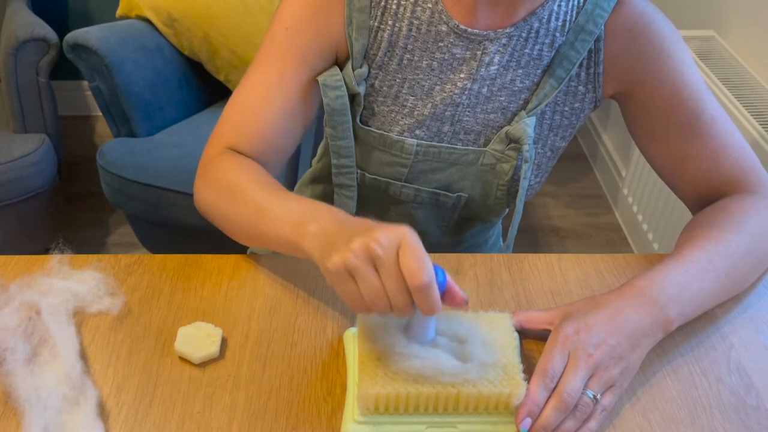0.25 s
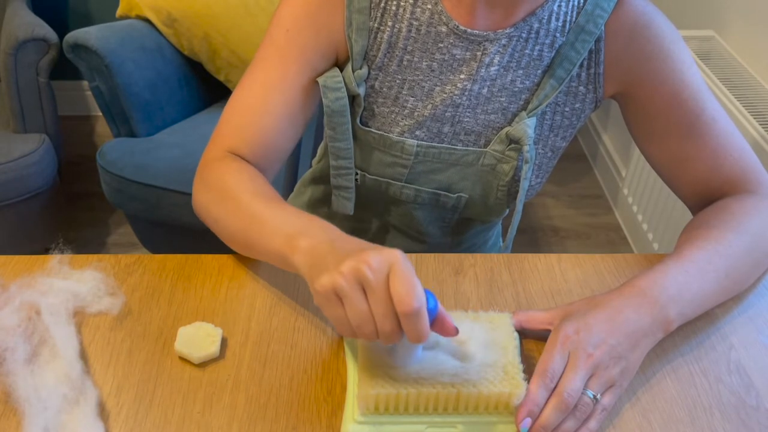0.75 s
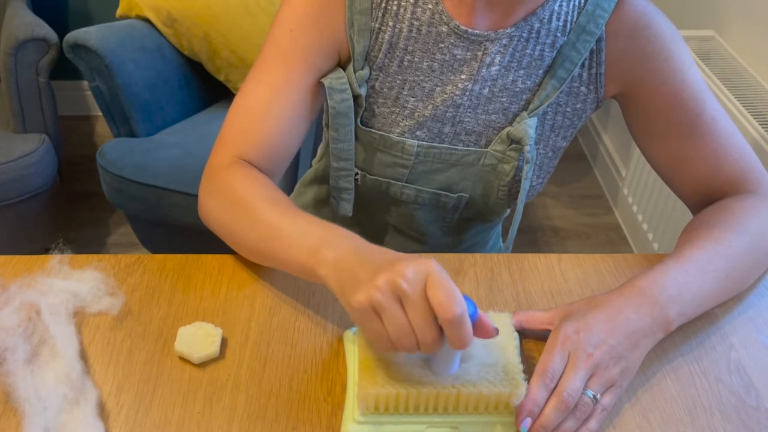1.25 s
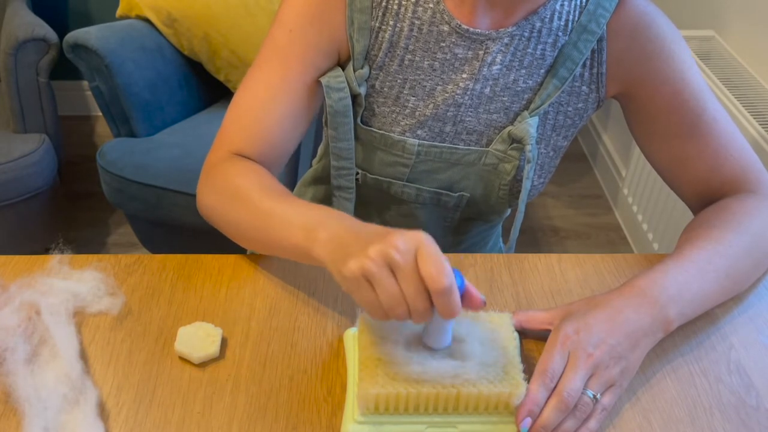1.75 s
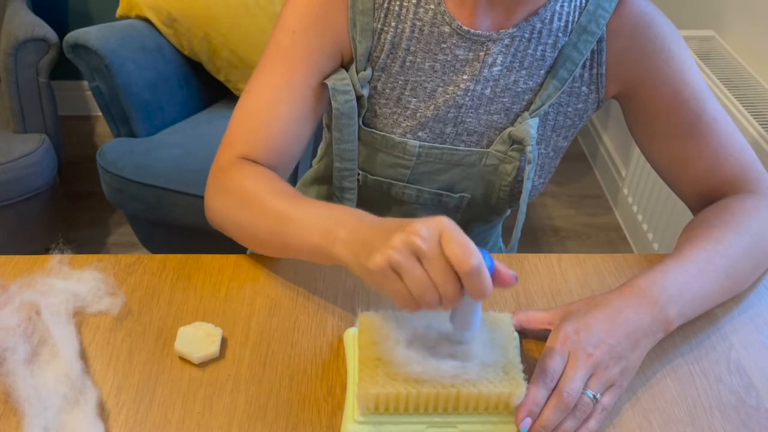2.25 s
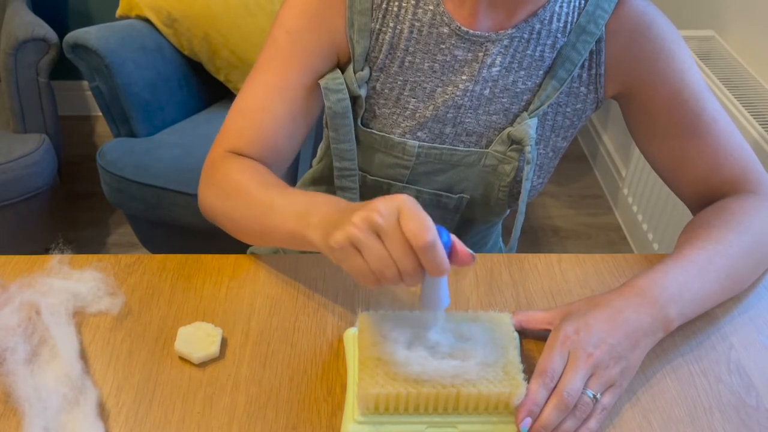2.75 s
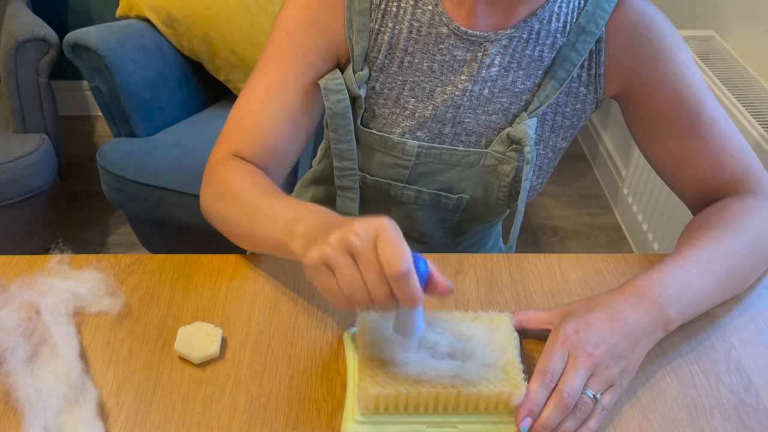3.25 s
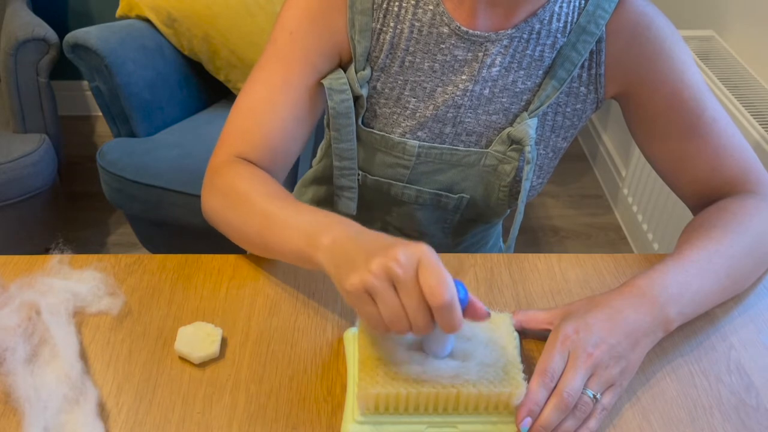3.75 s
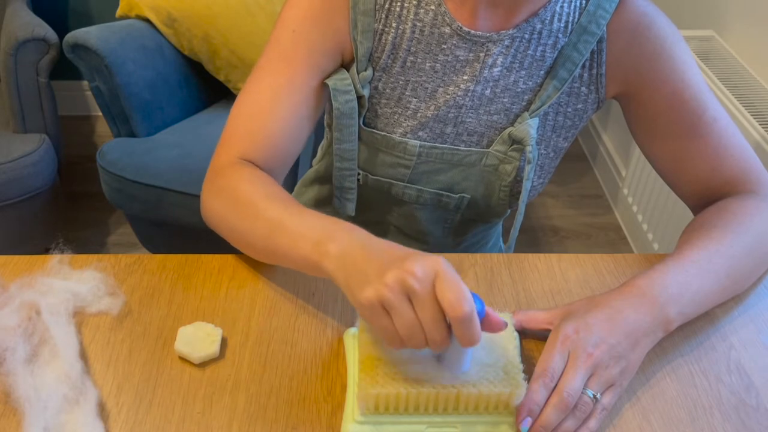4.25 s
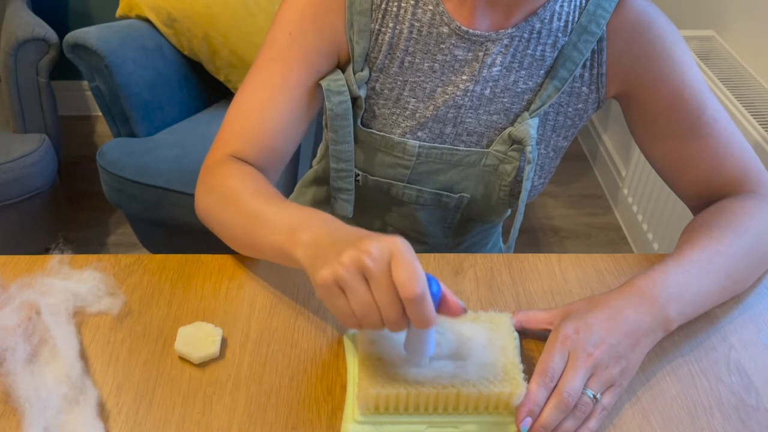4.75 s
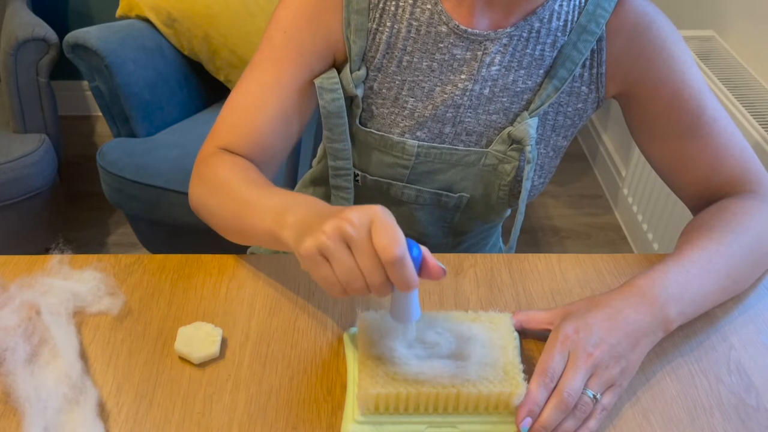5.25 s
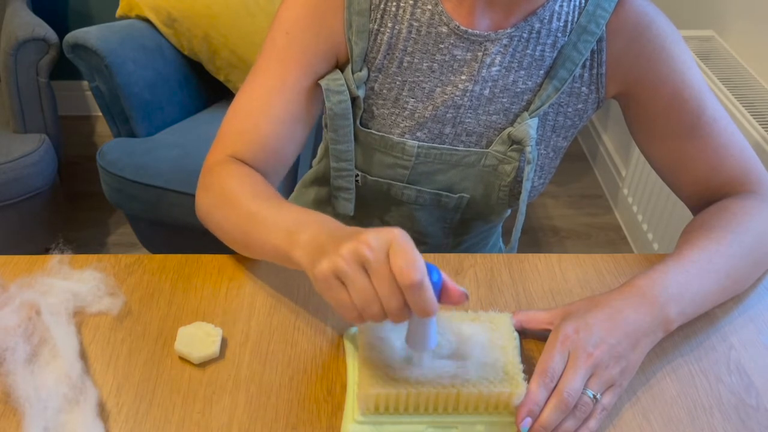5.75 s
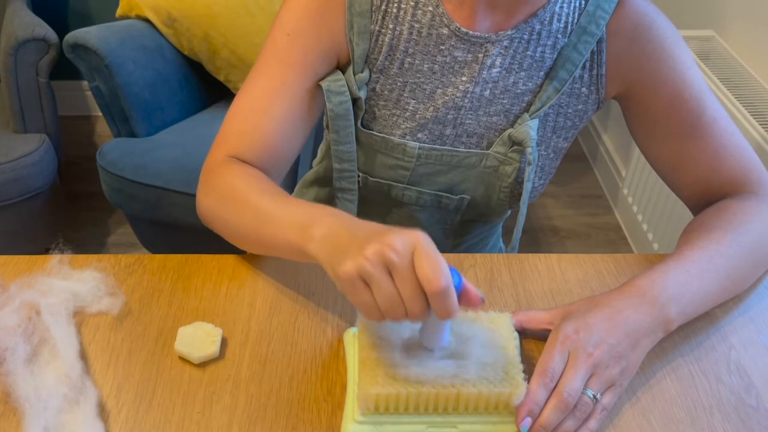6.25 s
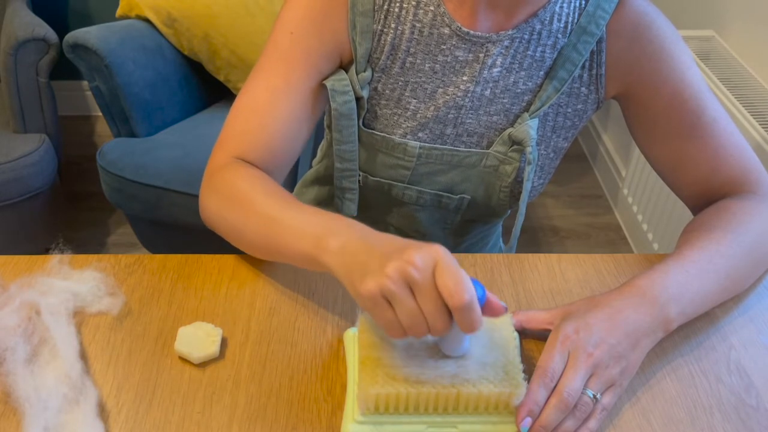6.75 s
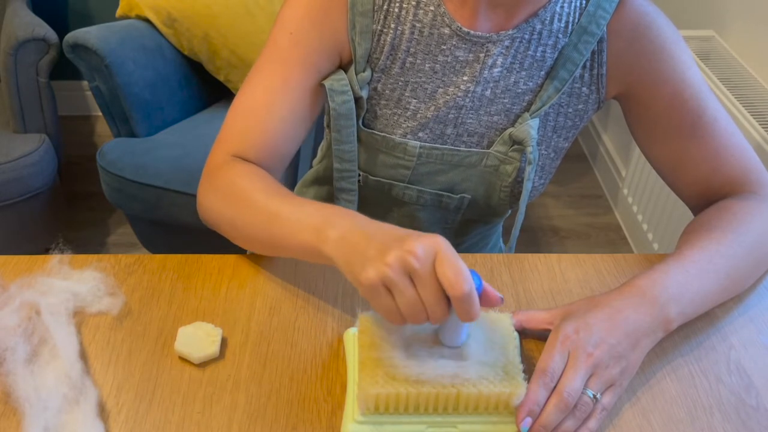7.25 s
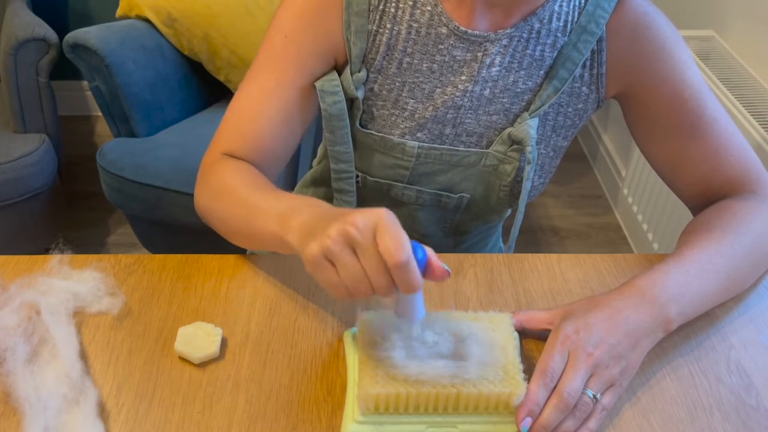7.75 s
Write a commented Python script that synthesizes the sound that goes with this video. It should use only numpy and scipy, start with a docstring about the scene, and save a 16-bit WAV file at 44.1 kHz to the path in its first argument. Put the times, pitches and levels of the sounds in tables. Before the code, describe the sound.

Close in a small room, a plastic multi-needle tool punches wool on a bristle mat about four times a second. Each stab brings a light clack, a short fibrous crunch, and a blunt low thump through the wooden table; as the tool lifts, its guard ticks free and snaps back sharply. Faint metallic ringing and a little room reflection follow, over low rumble and slight hiss.

```python
"""Needle felting at a wooden table: a spring-guarded multi-needle tool stabs wool on a bristle mat.
As the tool lifts, its plastic guard ticks free and snaps against its stop: short bursts of tiny impacts.
Before most stabs the guard clacks down; then bristles and fibres crunch as random grains of stick-slip.
The needle tips jab, and the tool bottoms out with a blunt knock and decaying modes of board and table.
After every contact needles and spring ring faintly and a small room answers, over steady rumble and hiss."""
import sys
import numpy as np
from scipy import signal
from scipy.fft import rfft, irfft
from scipy.io import wavfile
from scipy.ndimage import uniform_filter1d

SR = 44100
rng = np.random.default_rng(int(sys.argv[2]) if len(sys.argv) > 2 else 0)


def wrap_up_sound(samples):
    """Save the sound to the file named by the first command line argument, as 16-bit audio."""
    columns = np.atleast_2d(samples).T
    # keep every value between -1 and 1, then stretch to whole-number steps
    tamed = np.clip(columns, -1, 1)
    steps = np.round(tamed * 32767).astype(np.int16)
    wavfile.write(sys.argv[1], SR, steps)


N = 353461  # samples

# All levels in the tables are relative: each layer has a gain of its own.
# Stabs, timed where the tool bottoms out:
# [t/s, push level/dB, thump level/dB, knock level/dB, crunch level/dB]
STABS = [(0.162, -21.5, -23.5, -30, -38.5), (0.403, -21.5, -22, -29, -40),
         (0.651, -16.5, -20, -27.5, -42.5), (0.89, -22, -15, -30, -40.5), (1.127, -24.5, -17.5, -30.5, -43),
         (1.367, -24.5, -25.5, -48, -39.5), (1.591, -23.5, -22, -35, -41), (1.808, -28, -19, -26.5, -39.5),
         (2.039, -25, -18.5, -36.5, -40.5), (2.264, -27.5, -19.5, -32, -40.5),
         (2.507, -20.5, -17.5, -27.5, -38), (2.729, -19, -17, -23.5, -38), (2.969, -23, -20, -30.5, -38.5),
         (3.199, -17, -16, -24, -52), (3.435, -18.5, -19.5, -30, -40.5), (3.656, -27, -21, -37, -44.5),
         (3.888, -26.5, -20, -35, -44.5), (4.116, -26, -21.5, -35.5, -41),
         (4.341, -23.5, -16.5, -31.5, -46), (4.569, -20.5, -16, -30.5, -43.5),
         (4.812, -22, -22, -29.5, -41), (5.033, -19.5, -21.5, -26, -40), (5.259, -19.5, -20, -26.5, -37.5),
         (5.489, -16.5, -19, -25.5, -39), (5.712, -26, -17.5, -34.5, -38.5), (5.943, -25, -19, -33.5, -53),
         (6.193, -20.5, -21.5, -32, -41.5), (6.415, -26.5, -28, -42.5, -38.5),
         (6.642, -35, -28.5, -46.5, -44.5), (6.843, -25, -23.5, -55, -41), (7.085, -25.5, -23, -48.5, -42),
         (7.31, -21, -23.5, -34.5, -44), (7.515, -22.5, -24, -34.5, -43), (7.74, -18.5, -19.5, -27, -41),
         (7.961, -18.5, -22.5, -29.5, -40.5)]
# Guard springing back to its stop: [t/s, level/dB, strongest ring f/Hz, extra top/dB, extra barrel/dB]
SNAPS = [(0.0288, -12.5, 6500, 0, -0.5), (0.2666, -10.5, 7500, 4, 0.5), (0.4921, -1.5, 5850, 6, -1),
         (0.7398, -3, 5000, 2, 0), (0.9912, -0.5, 6410, 5, -0.5), (1.2339, -7, 6800, 0, 1.5),
         (1.4707, -4, 7760, 5.5, -3.5), (1.704, -11.5, 7620, -1, -0.5), (1.919, -10.5, 6300, 3, 0.5),
         (2.156, -7, 6780, 4, -2.5), (2.3657, -4, 6500, 0, 0), (2.611, -4.5, 6850, 6, -1),
         (2.8346, -5.5, 6100, 7, 2.5), (3.0661, -6.5, 5900, 3, -2.5), (3.3061, -1.5, 6600, 4, 1),
         (3.5439, -3, 6260, 2, 0.5), (3.7791, -13.5, 7160, 0, -2), (4.0031, -9, 6200, 0, -0.5),
         (4.2235, -3, 6500, 4, 0.5), (4.4516, -5.5, 6350, 7, 3), (4.6724, -6.5, 6370, 8.5, 2),
         (4.9067, -9, 7600, 0, 3), (5.136, -5, 7600, 8.5, -0.5), (5.359, -8.5, 7210, -1, 4),
         (5.5936, -3, 6350, 4.5, -5), (5.8235, -5.5, 6650, 3, 2.5), (6.0548, -6, 6800, 6, 3.5),
         (6.2972, -5.5, 6320, 3, -1.5), (6.5261, -7, 6350, -5, -1), (6.7397, -12, 4830, 4, -3.5),
         (6.9603, -4, 6600, 7, 2), (7.196, -19, 7950, 6, -6), (7.4057, -6, 6600, 7, 1),
         (7.6177, -5, 5330, 10, 1.5), (7.8397, -2.5, 6200, 4, 2.5)]
# Guard landing on the wool and being pushed in, plus one bright needle jab at 5.482 s: [t/s, level/dB, extra
# top/dB, extra barrel/dB]
CLACKS = [(0.135, -14.5, 1, -0.5), (0.3587, -37, -1, 6), (0.6402, -25.5, 8, 3), (0.8676, -15.5, 2.5, 0),
          (1.1046, -23.5, -10, 0.5), (1.3321, -21.5, -4, -2.5), (1.7778, -34.5, -11, 2),
          (1.9999, -30.5, -6, 10), (2.0106, -29, -12, 4), (2.223, -37, -8, 12), (2.4614, -33, -4, 3),
          (2.706, -17.5, -2, 1.5), (2.9363, -18, -6, -2), (3.1578, -25, -1, 4), (3.1711, -13, -1, -2),
          (3.8448, -33.5, -14, 4), (4.0645, -29.5, -1, 0), (4.5342, -35, -9, 7), (4.7809, -17.5, -0.5, 0),
          (4.9726, -27.5, -2, -4.5), (5.0105, -27, -4, -3), (5.2296, -14, -7.5, -4),
          (5.4392, -28.5, -6, -2), (5.4577, -26, 0, 0), (5.482, -27, 10, -6), (5.6919, -14.5, -3, -7),
          (5.916, -18.5, -3, 1.5), (6.1242, -26, -4, -2), (6.3857, -21.5, -7, -6.5), (7.0322, -25, -2, -1),
          (7.2729, -31.5, -14, 3), (7.4824, -17, -6, 0.5), (7.7076, -20.5, -1.5, 0.5),
          (7.896, -31.5, -5, 0), (7.909, -31, 1, 0)]
# Guard coming unstuck from the barrel as the hand lifts: [t/s, level/dB]
TICKS = [(0.0155, -16), (0.219, -14), (0.4607, -11), (0.9469, -14.5), (1.1902, -15.5), (1.4465, -12),
         (1.6674, -13.5), (1.8711, -17), (2.5683, -11.5), (2.7911, -13.5), (3.039, -11), (3.3695, -16),
         (3.968, -14.5), (4.1792, -14.5), (4.4232, -13), (4.8724, -12.5), (5.1113, -12), (5.3153, -15.5),
         (5.5644, -13.5), (5.7952, -15.5), (6.0124, -14), (6.2665, -9.5), (6.6947, -13), (6.911, -15.5),
         (7.153, -11.5), (7.3594, -24.5), (7.5702, -15), (7.795, -16.5)]

# Spectral envelopes of the plastic contacts and needle tips: [f/Hz, level/dB]
SNAP_ENVELOPE = [(400, -17), (620, -13), (950, 1), (1300, -19), (1550, -10.5), (2150, -15), (2800, -2),
                 (3800, -8.5), (4700, -3), (5400, -8.5), (6400, 0.5), (8200, -6), (12000, -20),
                 (15800, -27.5)]
CLACK_ENVELOPE = [(400, -32), (950, -1.5), (1300, -5.5), (1900, -6.5), (2900, -1.5), (4500, 3), (5600, 2.5),
                  (7300, 7), (10000, 0), (12200, 1), (13500, -3), (15800, -8.5)]
PRICK_ENVELOPE = [(400, -3), (1200, -1.5), (3200, -3), (4600, -0.5), (5600, -4), (7300, -0.5), (10000, 0),
                  (14000, -4.5), (15800, -2.5)]
TICK_ENVELOPE = [(400, -7), (950, -2.5), (1400, -10.5), (3700, -10), (4700, 4), (6000, -3.5), (7600, 1.5),
                 (8900, -1), (10500, -7), (15800, -17.5)]
# Spectral envelopes of the gritty tap, tearing fibres and buckling bristles: [f/Hz, level/dB]
TAP_ENVELOPE = [(150, -26.5), (450, 8.5), (800, -2), (1300, 0.5), (2200, -6.5), (3500, -10), (8000, -66)]
FIBRE_ENVELOPE = [(300, -5.5), (950, 10), (1300, -3), (1900, 5.5), (3200, 4), (4600, 7.5), (5400, 6),
                  (7300, 13), (9500, 4), (12500, 2.5), (16000, -8)]
BRISTLE_ENVELOPE = [(90, -20), (190, 7), (320, -6), (410, 0.5), (580, -24), (1000, -10.5), (2000, -29.5),
                    (5000, -45.5)]

# Deep modes of the table: [nominal f/Hz, level/dB, t60/s, swell time/s], and the sign of each mode
TABLE_MODES = [(26.35, -16.5, 1.9, 0.0088), (44.1, -8.5, 0.37, 0.0027), (67.8, 8, 0.27, 0.035),
               (93.76, -1.5, 0.32, 0.0054), (106.8, 3.5, 0.25, 0.0036)]
TABLE_SIGNS = [1, -1, 1, 1, -1]
# Modes of the mat's base and the table top: [nominal f/Hz, level/dB, t60/s]
BOARD_MODES = [(135.8, -1, 0.56), (154, 3, 0.45), (185.7, -2, 0.46), (212.1, 3.5, 0.22), (245.1, 3, 0.2),
               (270.3, 3, 0.3), (322.3, 0, 0.18), (356, -7.5, 0.35), (400, 1, 0.18), (438, -1, 0.18),
               (477, -9, 0.26), (657, -15.5, 0.43)]
# Modes of the needles and spring: [nominal f/Hz, level/dB, t60/s]
NEEDLE_MODES = [(4630, -2, .35), (4720, -2, .35), (6430, -3, .22), (6590, -5, .22), (7210, -3, .35),
                (7300, -3, .35), (9420, -13, .25)]

# The tool as it radiates sideways into the room: [f/Hz, level/dB]
SIDEWAYS_RADIATION = [(500, -2.5), (750, -2.5), (950, -2.5), (1500, -4), (2200, -3), (2900, -8), (4000, 3),
                      (6400, 5.5), (7800, 2.5), (10000, -3.5)]
# The room's response: [f/Hz, level/dB], and its reverberation time: [f/Hz, t60/s]
ROOM_RESPONSE = [(200, 2), (900, 1.5), (2000, 7), (3000, -1), (4700, -4.5), (7000, -8.5), (10000, 2.5),
                 (16000, 1)]
ROOM_T60 = [(200, 0.52), (1000, 0.73), (4000, 0.5), (8000, 0.34), (16000, 0.31)]
# Spectral density of the steady background: [f/Hz, level/dB per Hz]
BACKGROUND_DENSITY = [(18, -22), (26, 6.5), (33, -8.5), (50, -9.5), (100, -13), (190, -29.5), (450, -33),
                      (900, -53.5), (1400, -43.5), (3500, -46), (7300, -37), (11000, -53), (16000, -55)]


def amp(db):
    """A level in dB is twenty times the logarithm of the amplitude ratio."""
    return 10 ** (np.asarray(db) / 20)


def evened(x):
    """Normalisation to unit rms."""
    return x / np.sqrt(np.mean(x ** 2) + 1e-20)


def held(x, span):
    """Energy normalisation: a sound gets the energy of rms 1 held for span seconds."""
    return x * np.sqrt(span * SR / (np.sum(x ** 2) + 1e-20))


def read(points, hz):
    """Interpolation on a logarithmic frequency axis, constant beyond the end points."""
    f, value = np.transpose(points)
    return np.interp(np.log(hz + 1), np.log(f + 1), value)


def add(mix, s, sound):
    """Superposition: a sound is added into the mix from time s."""
    part = mix[max(round(s * SR), 0):][:len(sound)]
    part += sound[:len(part)]


def bins(size=2048):
    """Discrete spectrum: the frequencies in Hz of a transform of this size."""
    return np.fft.rfftfreq(size, 1 / SR)


def coloured(x, db):
    """Minimum-phase filtering: the log gain on bins() fixes the phase by the Hilbert transform."""
    log_gain = np.log(amp(np.concatenate([db, db[-2:0:-1]])))
    response = np.exp(np.conj(signal.hilbert(log_gain)))
    impulse = np.fft.ifft(response).real[:len(db)]
    return signal.fftconvolve(x, impulse)


def ring(t, hz, db, t60):
    """Damped mode: a sinusoid decays exponentially, by 60 dB in t60."""
    decay = np.exp(-np.log(1000) * t / t60)
    return amp(db) * decay * np.sin(2 * np.pi * hz * t)


def chatter(rise, fall, spiky=1.73, first=0, first_s=0.00053, size=2048):
    """Contact chatter: a brief flurry of random impacts, optionally led by a hard one, whitened overall."""
    t = np.arange(size) / SR
    impacts = rng.standard_normal(size)
    swell = (1 - np.exp(-t / rise)) * np.exp(-t / fall)
    flurry = np.sign(impacts) * abs(impacts) ** spiky * swell
    flurry[round(first_s * SR)] += first * np.linalg.norm(flurry)
    # the flurry is centred while its smoothed spectrum is flattened
    z = rfft(np.roll(flurry, size // 2))
    smooth_power = uniform_filter1d(abs(z) ** 2, size=71)
    even = irfft(z / np.sqrt(smooth_power + 1e-12))
    return np.roll(even, -size // 2)


def thumps(push_db, push_hz, lead, push_span, thump_db, spread):
    """Forced, then free vibration: the push sways the table; bottoming out rings its deep modes."""
    out, t = np.zeros(N), np.arange(SR // 2) / SR
    u = t[t < push_span]
    luck_by_stab = rng.standard_normal((len(STABS), len(TABLE_MODES)))
    for (s, push, thump, *_), luck in zip(STABS, luck_by_stab):
        hump = np.sin(np.pi * u / push_span) ** 1.62
        sway = hump * np.sin(2 * np.pi * push_hz * (1 + spread * luck[0]) * u)
        add(out, s - lead, amp(push + push_db) * sway)
        body = np.zeros(len(t))
        for (hz, db, t60, swell), sign, k in zip(TABLE_MODES, TABLE_SIGNS, luck):
            body += sign * ring(t, hz * (1 + spread * k), db, t60) * (1 - np.exp(-t / swell))
        add(out, s, amp(thump + thump_db) * held(body, 0.072))
    return out


def knocks(blow_db, blow_time, board_db, board_swell, uneven_db, detune, tap_db, tap_fall,
           firm_knock_db=-27.5, tap_growth=1.74):
    """Impact excitation: one blunt blow, the board's modes and a gritty tap, which grows faster."""
    out, taps, t = np.zeros(N), np.zeros(N), np.arange(SR // 3) / SR
    luck_by_stab = rng.standard_normal((len(STABS), len(BOARD_MODES), 3))
    for (s, _, _, knock, _), luck in zip(STABS, luck_by_stab):
        # a harder blow flattens the bristles sooner, so it is shorter
        u = t / (blow_time * amp(-.3 * (knock + 22)))
        blow = u * (2 - u) * np.exp(-u)
        add(out, s, amp(knock + blow_db) * held(blow, 0.043))
        # each stab lands on another spot, so the modes answer unevenly
        board = np.zeros(len(t))
        for (hz, db, t60), (a, b, c) in zip(BOARD_MODES, luck):
            board += np.sign(a) * ring(t, hz * (1 + detune * b), db + uneven_db * c, t60)
        board *= 1 - np.exp(-t / board_swell)
        add(out, s, amp(knock + board_db) * held(board, 0.029))
        # dB of tap per dB of knock, pivoting on a firm knock
        tap = firm_knock_db + tap_growth * (knock - firm_knock_db)
        grit = coloured(chatter(rise=0.0011, fall=tap_fall, spiky=1.7), read(TAP_ENVELOPE, bins()))
        add(taps, s, amp(tap + tap_db) * held(grit, 0.0078))
    return out, taps


def crunch(strengths, envelope, gain_db, grains_per_s, grain_db, stroke, clump_db=3, clump_span=0.0078):
    """Stick-slip friction: random grains in clumps; stroke lists [t from the bottom/s, level/dB]."""
    level = np.zeros(N)
    lag, db = np.transpose(stroke)
    swell = amp(np.interp(np.arange(lag[0], lag[-1], 1 / SR), lag, db))
    for (s, *_), loud in zip(STABS, strengths):
        add(level, s + lag[0], amp(loud) * swell)
    clumps = evened(uniform_filter1d(rng.standard_normal(N), round(clump_span * SR)))
    signs = rng.choice([-1, 1], N)
    sizes_db = grain_db * np.minimum(rng.exponential(1, N), 4) + clump_db * np.minimum(clumps, 1.5)
    slips = rng.random(N) < grains_per_s / SR
    grains = signs * amp(sizes_db) * slips
    return amp(gain_db) * level * evened(coloured(grains, read(envelope, bins()))[:N])


def clicks(rows, envelope, gain_db, ring_db, ring_width_hz, rise, fall, early=0, first=0,
           body_ring_db=0, body_width_hz=300, scatter=0.029):
    """Resonant filtering of contact chatter: each contact stresses other resonances, as the tool is held."""
    out, hz = np.zeros(N), bins()
    for s, db, ring_hz, *body in rows:
        shape = read(envelope, hz * (1 + scatter * rng.standard_normal()))
        shape += read([(100, -32), (400, 8)], hz)  # weak bass
        shape += ring_db / (1 + ((hz - ring_hz) / ring_width_hz) ** 2)
        if body:
            # hard contacts also wake the hollow barrel
            body_db, top_db, body_hz = body
            shape += read([(3300, body_db), (4600, 0), (8500, 0), (11000, top_db)], hz)
            shape += body_ring_db / (1 + ((hz - body_hz) / body_width_hz) ** 2)
        contact = coloured(chatter(rise, fall, first=first), shape)
        add(out, s - early, amp(db + gain_db) * held(contact, 0.008))
    return out


def returns(barrel_hz=3000, usual_db=-6, barrel_slope=0.61, scatter=0.075):
    """Level-dependent impact spectrum: the guard hits its stop, and soft snaps sound hollower than hard ones."""
    rows = []
    for (s, db, ring_hz, top_db, barrel_db), luck in zip(SNAPS, rng.standard_normal(len(SNAPS))):
        hollow_db = barrel_db - barrel_slope * (db - usual_db)
        rows.append((s, db, ring_hz, hollow_db, top_db, barrel_hz * (1 + scatter * luck)))
    return rows


def landings(ring_hz=7250, barrel_hz=1900, scatter=0.056):
    """Cavity resonance: the landing guard wakes its hollow barrel; the rings shift with the grip."""
    rows = []
    for (s, db, top_db, barrel_db), (a, b) in zip(CLACKS, rng.standard_normal((len(CLACKS), 2))):
        shifted_ring, shifted_barrel = ring_hz * (1 + scatter * a), barrel_hz * (1 + scatter * b)
        rows.append((s, db, shifted_ring, barrel_db, top_db, shifted_barrel))
    return rows


def pricks(lead=0.0016, usual_db=-34, usual_thump_db=-19, growth=1.23, low_hz=4500, high_hz=7500):
    """Impulsive excitation: tips jab just before the bottom, harder with the thump, waking one of two rings."""
    rows = []
    for (s, _, thump, *_), luck in zip(STABS, rng.random(len(STABS))):
        db = usual_db + growth * (thump - usual_thump_db)
        rows.append((s - lead, db, low_hz if luck < .5 else high_hz))
    return rows


def releases(ring_hz=7850, scatter=0.038, rebound_s=.0115, rebound_spread=0.18, rebound_db=-9.5, uneven_db=6.5):
    """Inelastic rebound: the guard ticks free, then rebounds once, as a rule more softly."""
    rows = []
    for (s, db), (a, b, c) in zip(TICKS, rng.standard_normal((len(TICKS), 3))):
        hz = ring_hz * (1 + scatter * a)
        delay = rebound_s * (1 + rebound_spread * b)
        rows.append((s, db, hz))
        rows.append((s + delay, db + rebound_db + uneven_db * c, hz))
    return rows


def needles(x, detune=0.0069, uneven_db=3, half_turns_per_s=1.27, count=3):
    """Modal convolution: jolts leave needles and spring singing, a little differently as the grip shifts."""
    t, time, out = np.arange(SR // 2) / SR, np.arange(N) / SR, np.zeros(N)
    for k, luck in enumerate(rng.standard_normal((count, len(NEEDLE_MODES), 2))):
        song = np.zeros(len(t))
        for (hz, db, t60), (a, b) in zip(NEEDLE_MODES, luck):
            song += ring(t, hz * (1 + detune * a), db + uneven_db * b, t60)
        # the shares rotate with constant total power
        share = np.sqrt(2 / count) * np.cos(np.pi * (half_turns_per_s * time + k / count))
        add(out, 0, signal.fftconvolve(x * share, held(song, 1 / SR)))
    return out


def room(x, delay, near_db, near_fall, count=3):
    """Reverberation: near reflections and a short tail of decaying noise, changing as the hand moves."""
    out, time = np.zeros(N), np.arange(N) / SR
    for k in range(count):
        hz, t, z = signal.stft(rng.standard_normal(SR // 2), SR, nperseg=256)
        late = np.exp(-np.log(1000) * t / read(ROOM_T60, hz)[:, None])
        near = amp(near_db) * np.exp(-t / near_fall)
        response = amp(read(ROOM_RESPONSE, hz))[:, None]
        tail = signal.istft(z * (late + near) * response, SR, nperseg=256)[1]
        share = np.sqrt(2 / count) * np.cos(np.pi * (time + k / count))
        add(out, delay, signal.fftconvolve(x * share, held(tail, 1 / SR)))
    return out


def background(level_db=-36.5):
    """Stationary noise: white noise shaped to the low rumble and faint hiss of the room."""
    spectrum = rfft(rng.standard_normal(N)) * amp(read(BACKGROUND_DENSITY, bins(size=N)))
    return amp(level_db) * evened(irfft(spectrum, N))


def scene():
    """Superposition of tool, wool, table and room, heard from across the table top."""
    _, push_db, _, _, crunch_db = np.transpose(STABS)
    tool = clicks(returns(), SNAP_ENVELOPE, gain_db=-14.0, ring_db=7, ring_width_hz=240,
                  rise=0.00084, fall=0.0015, first=0.31, body_ring_db=3.5, body_width_hz=330)
    tool += clicks(landings(), CLACK_ENVELOPE, gain_db=-1.0, ring_db=8, ring_width_hz=140,
                   rise=0.00036, fall=0.0025, early=.0004, body_ring_db=10)
    tool += clicks(pricks(), PRICK_ENVELOPE, gain_db=4.5, ring_db=8, ring_width_hz=200,
                   rise=0.0075, fall=0.0015)
    tool += clicks(releases(), TICK_ENVELOPE, gain_db=-13.5, ring_db=10, ring_width_hz=620,
                   rise=0.0002, fall=0.0023, first=0.42)
    # barbs tear past the fibres: strongly on the way in, weakly on the way out
    wool = crunch(crunch_db, FIBRE_ENVELOPE, gain_db=-1.5, grains_per_s=1900, grain_db=4.0,
                  stroke=[(-.048, -5), (-.032, 7.5), (-.002, 5), (.012, -60),
                          (.045, -14), (.08, -10), (.115, -13)])
    # bristles buckle in coarse, dull slips as the push builds
    bristles = crunch(push_db, BRISTLE_ENVELOPE, gain_db=-15.5, grains_per_s=700, grain_db=4,
                      stroke=[(-.05, -14), (-.03, -11), (-.005, 3.5), (.025, -4), (.06, -7), (.11, -11.5)])
    low = thumps(push_db=2.5, push_hz=97.3, lead=0.04633, push_span=0.082, thump_db=0.5, spread=0.047)
    knock, taps = knocks(blow_db=4, blow_time=0.0017, board_db=2, board_swell=0.0022,
                         uneven_db=0.5, detune=0.017, tap_db=-2.0, tap_fall=0.0053)
    soft = wool + bristles + taps
    sideways = coloured(tool, read(SIDEWAYS_RADIATION, bins()))[:N]
    wet = room(sideways + soft + amp(-8.5) * knock, delay=.004, near_db=0.5, near_fall=0.0047)
    direct = low + knock + tool + soft
    return (direct + amp(-25.5) * needles(tool) + amp(-9.0) * wet + background())[None]


def record(dry):
    """Transducer limits: the microphone's low cut, full-scale clipping, then the band limit."""
    low_cut = signal.butter(2, 14, "highpass", fs=SR, output="sos")
    clipped = np.clip(signal.sosfilt(low_cut, dry), -1, 1)
    band_limit = signal.firwin(255, 15900, window=("kaiser", 8), fs=SR)
    return signal.oaconvolve(clipped, band_limit[None], "same")


dry = scene()
out = record(dry)
wrap_up_sound(out)
```